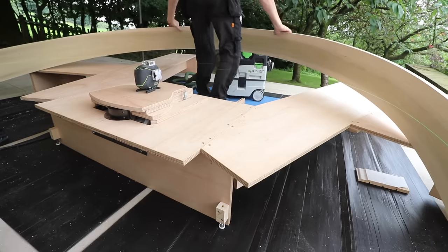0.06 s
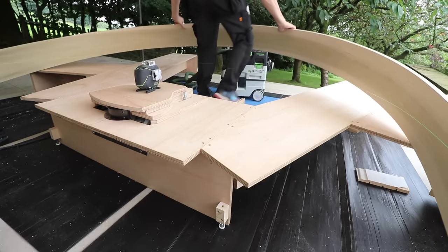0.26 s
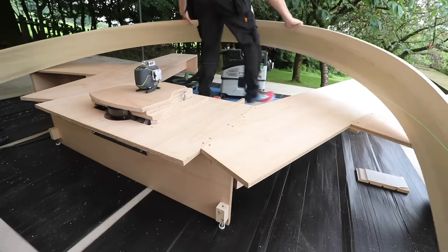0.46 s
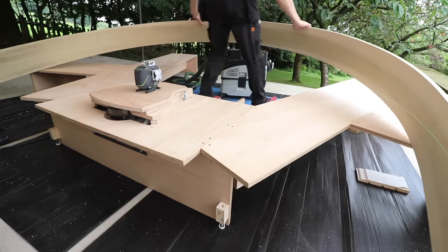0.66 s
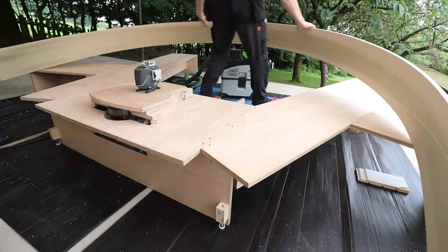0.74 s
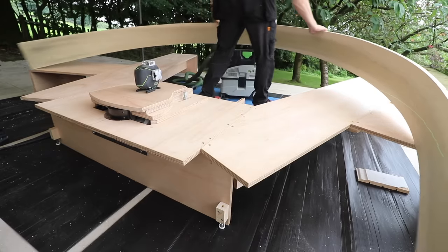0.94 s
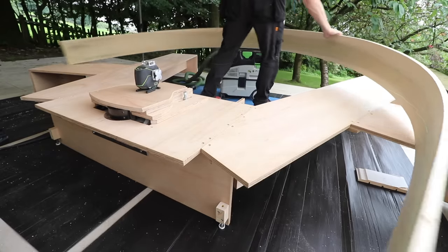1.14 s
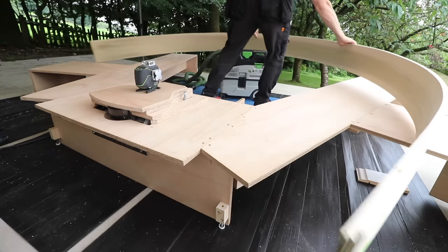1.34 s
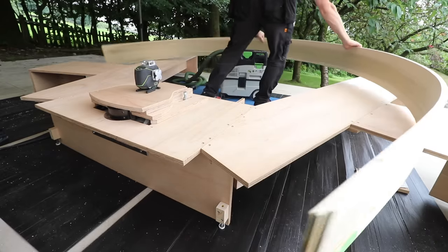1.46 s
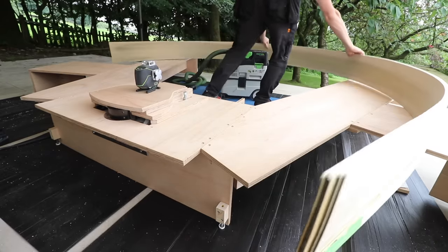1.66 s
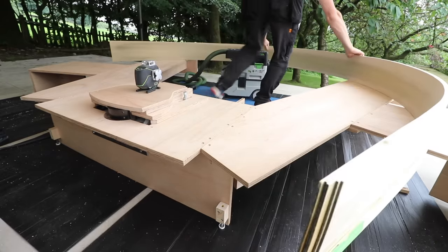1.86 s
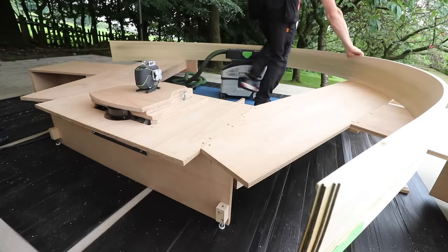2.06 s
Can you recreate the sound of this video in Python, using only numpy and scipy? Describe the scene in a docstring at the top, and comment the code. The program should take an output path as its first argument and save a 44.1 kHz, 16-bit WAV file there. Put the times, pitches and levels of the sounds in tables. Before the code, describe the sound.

A long bundle of wooden strips scrapes across a plywood bench, building from 0.2 seconds with ticks, catches and tiny squeaks, strongest around 0.7 to 0.9. From 1 second it slides more softly and groans briefly. Three hollow knocks land near 1.5, 1.6 and 1.7 seconds, the last with the loudest clatter of loose strips. Small bounces die away by 2 seconds. Faint leaf hiss and wind lie underneath.

```python
"""Wood scrapes and catches, slides more softly, groans briefly, then knocks three times and clatters.
A long bent bundle of thin wooden strips is dragged over a plywood bench outdoors. Stick-slip at its
edge rings the strips; the bundle knocks down on the bench and the loose strips slap together.
Behind it, leaves hiss and wind touches the microphone. A limiter ducks the level after the knocks."""
import sys
import numpy as np
from scipy import signal
from scipy.fft import rfft, irfft
from scipy.io import wavfile
from scipy.ndimage import uniform_filter1d, minimum_filter1d

SR = 44100
rng = np.random.default_rng(int(sys.argv[2]) if len(sys.argv) > 2 else 0)


def waveform_to_disk(signal):
    """Save audio, clipped to [-1, 1], as 16-bit WAV at the path in sys.argv[1]."""
    frames = np.transpose(np.atleast_2d(signal))
    scaled = np.clip(frames, -1, 1) * 32767
    samples = np.round(scaled).astype(np.int16)
    wavfile.write(sys.argv[1], SR, samples)


N = 92610

# Table levels are relative; spectra give shape only.
# Leaves and distant air. Each row: frequency in Hz, density in dB.
AIR_SPECTRUM = [(25, -0.5), (60, 7.5), (150, -8), (400, -4.5), (1000, -8), (2000, -11.5), (4000, -17),
                (8500, -20), (11000, -27), (16000, -29)]
# Wind on the microphone. Each row: time in seconds, level in dB.
WIND_ENVELOPE = [(0, -42), (.04, -55), (.45, -53), (.53, -55), (.63, -47), (.75, -78), (.92, -45),
                 (1.08, -59), (1.2, -40.5), (1.32, -54), (1.45, -48), (1.6, -53), (2.1, -57)]
# Sliding hiss. Each row: time in seconds, level in dB.
SLIDE_ENVELOPE = [(0, -64), (.12, -59.5), (.3, -50), (.575, -51), (.603, -39), (.635, -49.5), (.68, -46.5),
                  (.9, -46.5), (1.05, -44.5), (1.22, -44), (1.35, -54.5), (1.41, -81), (1.5, -99),
                  (2.1, -58.5)]
# Sliding hiss. Each row: frequency in Hz, density in dB.
SLIDE_SPECTRUM = [(300, -6.5), (700, 12), (1000, -5.5), (2200, 5.5), (3500, 1.5), (5000, -3), (7000, -10.5),
                  (8700, -9.5), (10500, -18), (14000, -20), (16000, -46)]
# Swishes of the face. Each row: start in seconds, length in seconds, level in dB, centre in Hz.
SWISH_EVENTS = [(.002, 0.033, -50.5, 7540), (0.572, 0.062, -40.5, 8700), (1.517, 0.057, -31.5, 6000),
                (1.562, 0.059, -35.5, 6400), (1.633, 0.08, -37, 5600)]
# Grit under the face. Each row: frequency in Hz, density in dB.
GRIT_SPECTRUM = [(1000, 15), (2300, 5), (3700, 6.5), (4800, -4.5), (6300, 0), (8600, 3.5), (9900, -13),
                 (16000, -39)]
# Rubbed resonances. Each row: start and length in seconds, level in dB, pitch in Hz, T60 in seconds.
GROAN_EVENTS = [(1.029, 0.13, -43, 755, 0.064), (1.083, 0.14, -49.5, 2010, 0.06),
                (1.124, 0.15, -56, 4080, .03), (1.206, 0.11, -39.5, 220, 0.2),
                (1.211, 0.19, -37.5, 349.6, 0.17), (1.22, 0.11, -46, 400, 0.064),
                (1.228, 0.131, -50.5, 540, 0.076), (1.269, 0.13, -46.5, 1180, 0.016),
                (1.336, 0.098, -43.5, 255, 0.052)]
# Stick-slip squeaks. Each row: start in seconds, length in seconds, level in dB, pitch in Hz.
SQUEAK_EVENTS = [(0.185, 0.023, -40.5, 763), (0.467, 0.02, -30.5, 1560), (0.556, 0.035, -37.5, 1600),
                 (0.642, 0.016, -33.5, 2243), (0.834, 0.017, -30, 1554), (0.892, 0.012, -49, 8900),
                 (0.905, 0.0063, -29.5, 2910), (0.917, 0.0077, -50, 9150), (1.001, 0.0068, -48, 8200)]
# Fibres snapping free. Each row: start in seconds, level in dB, centre in Hz.
SNAG_EVENTS = [(0.17, -30.5, 1060), (0.2221, -31.5, 1550), (0.235, -22, 880), (0.263, -27, 1430),
               (0.3087, -24, 1780), (0.3121, -29, 1480), (0.3569, -19.5, 1510), (0.3604, -22, 1300),
               (0.379, -22, 1010), (0.4014, -21, 1080), (0.4374, -22, 1050), (0.5151, -23, 1610),
               (0.5491, -19, 1360), (0.6445, -26.5, 2210), (0.6786, -21, 1380), (0.6924, -16.5, 1510),
               (0.7212, -15, 1350), (0.7267, -26, 1380), (0.735, -19, 1330), (0.75, -29, 1380),
               (0.835, -25, 1490), (0.894, -17, 1500), (0.9696, -24, 1270), (1.0043, -25.5, 2330)]
# Hard bites of the edge. Each row: start in seconds, length in seconds, level in dB.
RASP_EVENTS = [(0.89, 0.0082, -24.5), (0.9, 0.018, -35), (0.915, 0.01, -26), (1.002, 0.027, -37)]
# Biting edge. Each row: frequency in Hz, density in dB.
RASP_SPECTRUM = [(200, -25), (900, -6), (1500, 4.5), (2100, 4.5), (2800, 0), (3500, -4), (4200, -16.5),
                 (6000, -19), (8200, -30), (9000, -27), (9800, -32), (16000, -45)]
# Edge judders. Each row: start in seconds, level in dB, length in seconds,
# treble tilt in dB per octave.
CATCH_EVENTS = [(0.273, -37, 0.035, -10), (0.434, -42, 0.0061, -1), (0.714, -23, 0.0038, -1.5),
                (0.7333, -22.5, 0.0078, -7.5), (0.913, -22.5, 0.01094, -2), (0.961, -31, 0.018, 2)]
# Catching edge, before tilt. Each row: frequency in Hz, density in dB.
CATCH_SPECTRUM = [(30, -8), (80, -6), (160, 0), (480, 14), (900, 4), (1500, -11), (2200, -4), (3300, -20),
                  (4500, -22.5), (9000, -31), (11000, -40), (16000, -51)]
# Loose strips colliding. Each row: start in seconds, level in dB.
SLAP_EVENTS = [(1.497, -13), (1.533, -10), (1.651, -10.5), (1.7138, -2.5), (1.7172, 4), (1.7192, 2.5),
               (1.7295, -6.5), (1.7338, 0.5), (1.739, -9), (1.755, -16), (1.781, -16.5), (1.895, -22.5)]
# One slap. Each row: frequency in Hz, density in dB.
SLAP_SPECTRUM = [(60, -43), (150, -21), (330, 0.5), (700, 10.5), (1000, 4), (1500, 4.5), (2200, -2),
                 (2500, -13), (5000, -44), (16000, -61)]
# Modes of the slapped strips. Each row: frequency in Hz, level in dB, T60 in seconds.
CLACK_MODES = [(299, -3, 0.14), (442, -5, 0.19), (558.6, 0.5, 0.2), (709, 5, 0.14), (1260, -0.5, 0.14),
               (1367, -2, 0.065), (1820, -18, 0.046), (2070, -14, 0.08)]
# Knocks and lighter bounces. Each row: start in seconds, then thud, ring and tick levels in dB.
KNOCK_EVENTS = [(1.4706, 3, -6.5, -13.5), (1.5441, -9, -12.5, -24), (1.583, 1.5, -5.5, -17),
                (1.7083, 0, -6.5, -19.5), (1.781, -15, -19.5, -55), (1.846, -23, -27, -47),
                (1.939, -25, -34.5, -34)]
# Hollow bench top. Each row: frequency in Hz, level in dB, T60 in seconds.
BENCH_MODES = [(189, -19.5, 0.21), (384.9, -31.5, 0.51), (486.5, -23, 0.14), (540, -0.5, 0.015),
               (616, -30, 0.34), (902, -23.5, 0.073), (1150, -14.5, 0.0079), (1692, -8, 0.0071)]
# Contact tick of a knock. Each row: frequency in Hz, density in dB.
TICK_SPECTRUM = [(300, 1), (1500, 14), (3000, -1), (5000, -5), (8000, -14), (11000, -20), (16000, -34)]
# Strips ringing after a knock. Each row: frequency in Hz, density in dB.
RING_SPECTRUM = [(30, -51), (60, -40), (85, -6), (120, 1.5), (190, 6), (270, 4.5), (480, 7), (750, -1.5),
                 (1000, -3), (1500, -10.5), (2200, -17), (3500, -26.5), (8000, -46), (16000, -84)]
# Decay of the wood's dense modes. Each row: frequency in Hz, T60 in seconds before t60_scale.
WOOD_DECAY = [(100, 0.78), (200, 0.53), (500, 0.23), (1000, 0.45), (2000, 0.23), (5000, 0.3), (12000, 0.37)]
# Main strip resonances. Each row: frequency in Hz, level in dB, T60 in seconds.
STRIP_MODES = [(195, -24, 0.12), (332, 8.5, 0.15), (494.3, 5, 0.2), (603.5, 0, 0.36), (781, 10.5, 0.055),
               (1030, -25, 0.079), (1102, 5, 0.017), (1409, 7.5, 0.069), (1470, -1, 0.26), (1561, 9, 0.1),
               (2250, -7, 0.18), (2460, -7, 0.028), (2713, -2.5, 0.074), (3430, -3, 0.02)]
# Low flexing boom. Each row: time in seconds, level in dB.
BOOM_ENVELOPE = [(0, -53), (.09, -59), (.18, -46), (.3, -39.5), (.42, -36.5), (.52, -29), (.59, -43.5),
                 (.65, -29), (.69, -36), (.74, -32), (.86, -39.5), (.92, -35), (.98, -29), (1.09, -44),
                 (1.14, -42), (1.27, -37.5), (1.45, -49), (1.49, -37), (1.6, -38), (1.86, -30.5),
                 (1.93, -45), (2.02, -57), (2.1, -80)]
# Low flexing boom. Each row: frequency in Hz, density in dB.
BOOM_SPECTRUM = [(50, -36.5), (90, -10), (120, -1.5), (165, -1), (220, -3), (300, -9.5), (600, -16),
                 (2000, -60)]
# Scraping edge. Each row: time in seconds, level in dB.
SCRAPE_ENVELOPE = [(0.0, -55.5), (0.068, -55.5), (0.162, -43.5), (0.28, -33), (0.348, -35.5), (0.36, -32),
                   (0.41, -31.5), (0.426, -39.5), (0.438, -30), (0.515, -31.5), (0.54, -33.5), (0.565, -34),
                   (0.63, -33), (0.716, -32), (0.764, -26.5), (0.914, -28), (1.032, -40.5), (1.362, -43),
                   (1.418, -70), (1.446, -82), (1.46, -72)]
# Scraping edge. Each row: frequency in Hz, density in dB.
SCRAPE_SPECTRUM = [(40, -38), (100, -17.5), (250, -3.5), (480, 0), (760, 3), (1000, -2), (1550, 0.5),
                   (2000, -5), (2700, -16), (4000, -21.5), (8000, -32.5), (16000, -47)]

TIME_S = np.arange(N) / SR


def from_db(db):
    """Decibels to gain."""
    return 10 ** (np.asarray(db) / 20)


def unit_rms(x):
    """Scale to unit rms."""
    return x / np.sqrt(np.mean(x ** 2) + 1e-20)


def unit_energy(x):
    """Scale to unit energy."""
    return x / np.sqrt(np.sum(x ** 2) + 1e-20)


def envelope(rows):
    """Gain over time from (s, dB) points."""
    return from_db(np.interp(TIME_S, *np.transpose(rows)))


def arch(start_s, length_s):
    """Half-sine swell."""
    return np.sin(np.pi * np.clip((TIME_S - start_s) / length_s, 0, 1))


def at_hz(rows, hz):
    """Read a table on a log-frequency axis."""
    row_hz, values = np.transpose(rows)
    return np.interp(np.log(np.maximum(hz, 1)), np.log(row_hz), values)


def drift(knots_per_s):
    """Random wander between unit-variance knots."""
    return np.interp(TIME_S * knots_per_s, np.arange(N), rng.standard_normal(N))


def through(x, response):
    """Convolve with an impulse response."""
    return signal.fftconvolve(x, response)[:N]


def bandpass(x, low_hz, high_hz):
    """Butterworth band-pass."""
    return signal.sosfilt(signal.butter(2, [low_hz, high_hz], "band", fs=SR, output="sos"), x)


def add(out, start_s, sound):
    """Mix a sound in at a time."""
    i = int(start_s * SR)
    out[i:i + len(sound)] += sound[:N - i]


def steady(x, window_samples=2200):
    """Even out slow level swings, keeping the grain."""
    return x / np.sqrt(np.maximum(uniform_filter1d(x ** 2, window_samples), 0) + 1e-9)


def colour(spectrum, tilt_db_per_octave=0, tilt_from_hz=310, taps=4096):
    """Minimum-phase filter of unit energy with the given spectrum."""
    hz = np.maximum(np.arange(taps // 2 + 1) * SR / taps, 10)
    db = at_hz(spectrum, hz) + tilt_db_per_octave * np.log2(np.maximum(hz, tilt_from_hz))
    cepstrum = irfft(np.log(from_db(db)))
    cepstrum[1:taps // 2] *= 2
    cepstrum[taps // 2 + 1:] = 0
    return unit_energy(irfft(np.exp(rfft(cepstrum))))


def mode(hz, t60_s):
    """One decaying sine."""
    t = TIME_S[:SR // 2]
    return np.sin(2 * np.pi * hz * t) * from_db(-60 * t / t60_s)


def wood_ring(t60_scale):
    """Dense modes of the long strips as decaying noise bands; unit energy."""
    out, edges_hz = 0, np.geomspace(50, 17000, 16)
    for low_hz, high_hz in zip(edges_hz, edges_hz[1:]):
        band = bandpass(rng.standard_normal(SR), low_hz, high_hz)
        t60_s = t60_scale * at_hz(WOOD_DECAY, np.sqrt(low_hz * high_hz))
        fade = from_db(-60 * TIME_S[:SR] / t60_s)
        out = out + unit_energy(band * fade) * np.sqrt(high_hz - low_hz)
    return unit_energy(out)


def wood_response(t60_scale=0.33, ring_db=0):
    """A direct click, then the wood's ringing."""
    response = from_db(ring_db) * wood_ring(t60_scale)
    response[0] += 1
    return unit_energy(response)


def slips(per_s, spread_db=3.5):
    """Random stick-slip impulses of uneven size; unit rms."""
    sizes = from_db(spread_db * np.minimum(rng.exponential(1, N), 3))
    signs = rng.choice([-1, 1], N)
    return unit_rms(sizes * signs * (rng.random(N) < per_s / SR))


def outdoors(air_db=-55):
    """Leaves and distant air hiss; light wind rumbles on the microphone."""
    air = unit_rms(through(rng.standard_normal(N), colour(AIR_SPECTRUM)))
    wind = bandpass(rng.standard_normal(N + SR), low_hz=15, high_hz=45.8)[SR:]
    return from_db(air_db) * air + envelope(WIND_ENVELOPE) * steady(wind, window_samples=6000)


def sliding(echo_gain=0.43, first_delay_s=0.0019, growth_per_s=0.198):
    """The smooth face hisses, comb-filtered by an echo from the strip's receding end."""
    hiss = through(slips(per_s=9000), colour(SLIDE_SPECTRUM))
    delay_s = first_delay_s * (1 + growth_per_s * TIME_S)
    echo = np.interp(TIME_S - delay_s, TIME_S, hiss)
    return envelope(SLIDE_ENVELOPE) * unit_rms(hiss + echo_gain * echo)


def swishes():
    """Grit rubs under the strip's face in short bright swells."""
    out = np.zeros(N)
    grit = unit_rms(through(slips(per_s=4200), colour(GRIT_SPECTRUM)))
    for start_s, length_s, db, hz in SWISH_EVENTS:
        resonance = unit_rms(through(grit, mode(hz, t60_s=0.00097)))
        out += from_db(db) * unit_rms(grit + resonance) * arch(start_s, length_s)
    return out


def groan(fade_s=0.041):
    """The contact travels along the bent strip, rubbing up one resonance after another."""
    out, drive = np.zeros(N), slips(per_s=2400)
    for start_s, length_s, db, hz, t60_s in GROAN_EVENTS:
        swell = np.clip(np.minimum(TIME_S - start_s, start_s + length_s - TIME_S) / fade_s, 0, 1)
        out += from_db(db) * swell * steady(through(drive, mode(hz, t60_s)))
    return out


def squeaks(gain_db=3, jitter_hz=170, jitter_per_s=1095, roughness_db=2, overtone_db=-31):
    """Slips briefly fall into step and give an unsteady pitch."""
    out = np.zeros(N)
    for start_s, length_s, db, hz in SQUEAK_EVENTS:
        samples = int(length_s * SR)
        pitch_hz = hz + jitter_hz * drift(jitter_per_s)[:samples]
        phase = 2 * np.pi * np.cumsum(pitch_hz) / SR
        tone = np.sin(phase) + from_db(overtone_db) * np.sin(2 * phase)
        roughness = from_db(roughness_db * drift(jitter_per_s)[:samples])
        swell = np.sin(np.pi * np.sqrt(np.linspace(0, 1, samples)))
        add(out, start_s, from_db(db + gain_db) * tone * roughness * swell)
    return through(out, wood_response(ring_db=-4.5))


def snags(rise_s=0.00074):
    """Single fibres snag and snap free; each short tick rings the wood."""
    out, t = np.zeros(N), TIME_S[:SR // 50]
    swell = t / rise_s * np.exp(1 - t / rise_s)
    for start_s, db, hz in SNAG_EVENTS:
        add(out, start_s, from_db(db) * swell * np.sin(2 * np.pi * hz * t))
    return through(out, wood_response(t60_scale=0.29, ring_db=0.5))


def rasps():
    """Where the edge bites, slips crowd into hard bright bursts."""
    out = np.zeros(N)
    grain = steady(through(slips(per_s=3000), colour(RASP_SPECTRUM)), window_samples=300)
    for start_s, length_s, db in RASP_EVENTS:
        out += from_db(db) * grain * np.sqrt(2) * arch(start_s, length_s)
    return through(out, wood_response(ring_db=-2.5))


def catches(gain_db=-2.5, shortest_s=0.004):
    """The edge catches, then lets go in a short burst of hard slips."""
    out, drive = np.zeros(N), slips(per_s=1200)
    for start_s, db, length_s, tilt_db_per_octave in CATCH_EVENTS:
        end_s = start_s + max(length_s, shortest_s)
        burst = unit_rms(drive[int(start_s * SR):int(end_s * SR)])
        judder = through(burst, colour(CATCH_SPECTRUM, tilt_db_per_octave))
        add(out, start_s, from_db(db + gain_db) * judder)
    return through(out, wood_response())


def clatter(slap_gain_db=5, clack_gain_db=6):
    """Loose strips slap together; each slap rings their modes with new strengths."""
    slaps, clacks, slap = np.zeros(N), np.zeros(N), colour(SLAP_SPECTRUM)
    for start_s, db in SLAP_EVENTS:
        add(slaps, start_s, from_db(db + slap_gain_db) * slap)
        clack = sum(rng.choice([-1, 1]) * rng.uniform(0.47, 1) * from_db(mode_db) * mode(hz, t60_s)
                    for hz, mode_db, t60_s in CLACK_MODES)
        add(clacks, start_s, from_db(db + clack_gain_db) * unit_energy(clack))
    return through(slaps, wood_response(t60_scale=0.42, ring_db=-4)) + clacks


def knocks(thud_rise_s=0.00071, tick_t60_s=0.0029, ring_gain_db=19.5):
    """The bundle hits the bench: a tick, a hollow thud and the long ringing of the strips."""
    out, t = np.zeros(N), TIME_S[:SR // 2]
    bench = sum((-1) ** k * from_db(db) * mode(hz, t60_s)
                for k, (hz, db, t60_s) in enumerate(BENCH_MODES))
    thud = bench * (1 - np.exp(-(t / thud_rise_s) ** 2))
    for start_s, thud_db, ring_db, tick_db in KNOCK_EVENTS:
        tick = rng.standard_normal(len(t)) * from_db(-60 * t / tick_t60_s)
        ring = unit_energy(through(wood_ring(t60_scale=1), colour(RING_SPECTRUM)))
        add(out, start_s, from_db(tick_db) * through(tick, colour(TICK_SPECTRUM)))
        add(out, start_s, from_db(thud_db) * thud)
        add(out, start_s, from_db(ring_db + ring_gain_db) * ring)
    return out


def scrape(edge_gain_db=-1.5, boom_gain_db=-2.5, modes_db=-4, flutter_db=2):
    """Slips of the edge excite the strip's dense ringing, main resonances and low flexing boom."""
    drive = slips(per_s=600) * from_db(-flutter_db * drift(knots_per_s=48.7))
    body = through(wood_response(), colour(SCRAPE_SPECTRUM))
    modes = sum((-1) ** k * from_db(db) * unit_energy(mode(hz, t60_s))
                for k, (hz, db, t60_s) in enumerate(STRIP_MODES))
    ringing = unit_rms(through(drive, body)) + from_db(modes_db) * unit_rms(through(drive, modes))
    edge = envelope(SCRAPE_ENVELOPE) * steady(ringing)
    boom = envelope(BOOM_ENVELOPE) * steady(through(drive, colour(BOOM_SPECTRUM)))
    return from_db(edge_gain_db) * edge + from_db(boom_gain_db) * boom


def scene():
    """All sources at one microphone."""
    dragging = scrape() + catches() + snags() + rasps() + squeaks() + groan() + sliding() + swishes()
    return (dragging + knocks() + clatter() + outdoors())[None]


def record(dry):
    """Fast limiter with slow release, then a steep low-pass."""
    limit_db, release_db_per_s, window_s, cutoff_hz = -12, 25, 0.0018, 15800
    window_samples = int(window_s * SR)
    over_db = np.maximum(20 * np.log10(np.abs(dry[0]) + 1e-9) - limit_db, 0)
    release_db = release_db_per_s * TIME_S
    reduction_db = np.maximum.accumulate(over_db + release_db) - release_db
    gain_db = uniform_filter1d(minimum_filter1d(-reduction_db, window_samples), window_samples)
    lowpass = signal.ellip(12, .1, 80, cutoff_hz, fs=SR, output="sos")
    return signal.sosfilt(lowpass, dry * from_db(gain_db))


dry = scene()
out = record(dry)
waveform_to_disk(out)
```